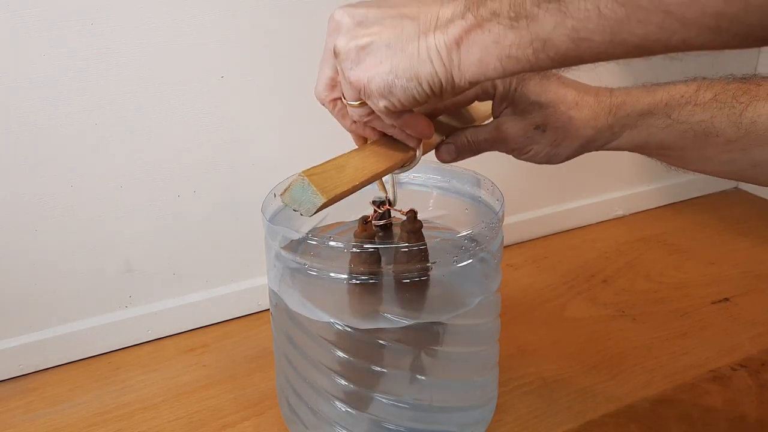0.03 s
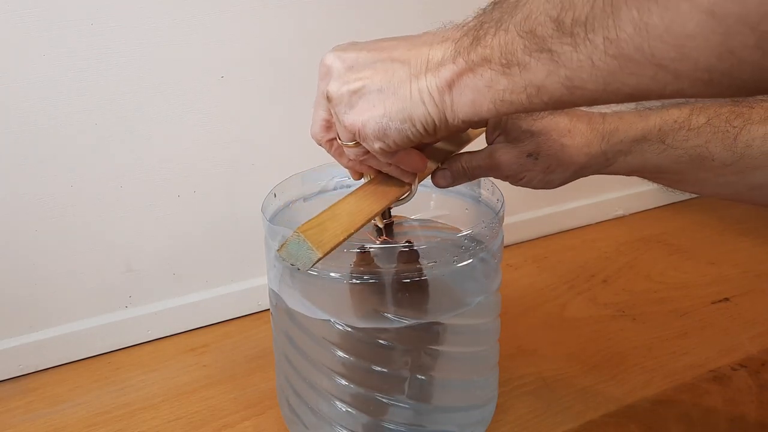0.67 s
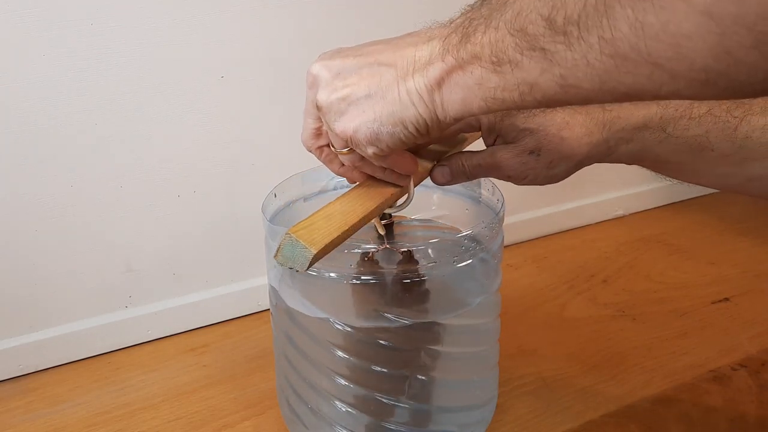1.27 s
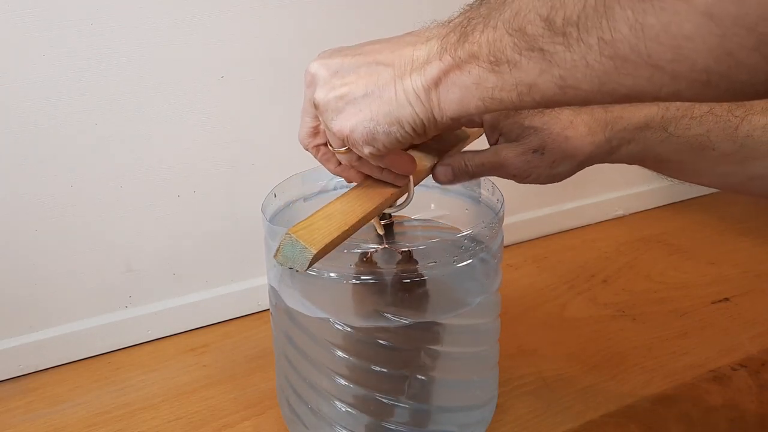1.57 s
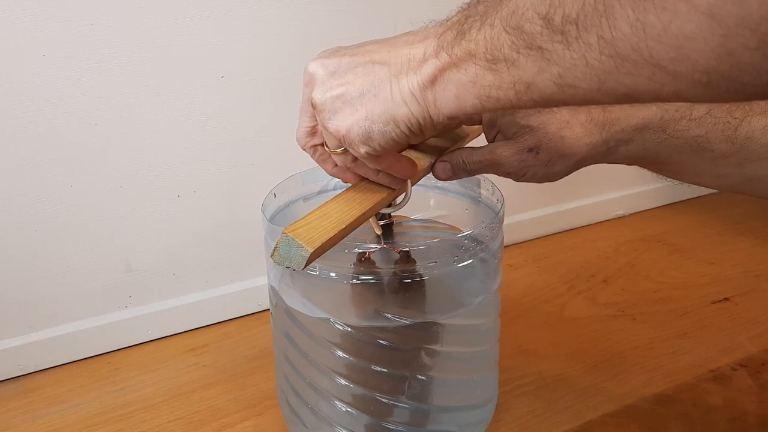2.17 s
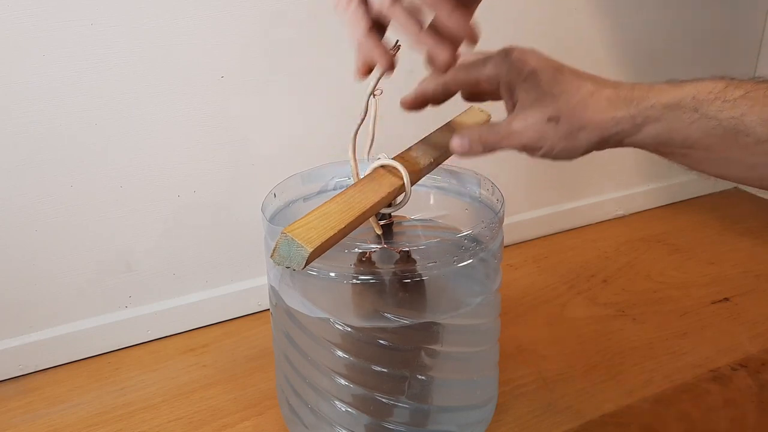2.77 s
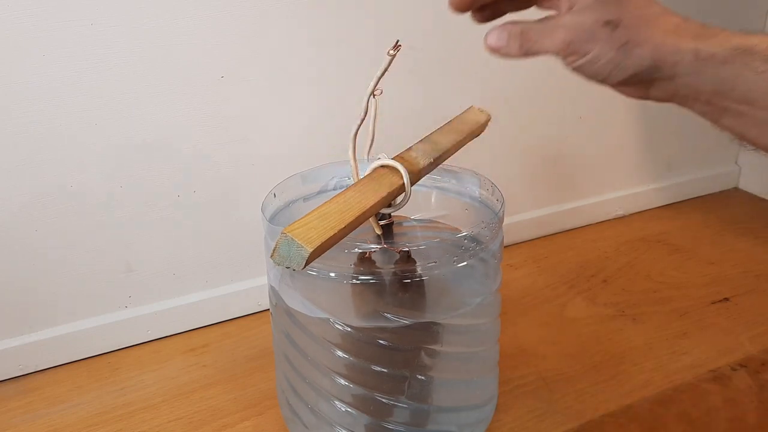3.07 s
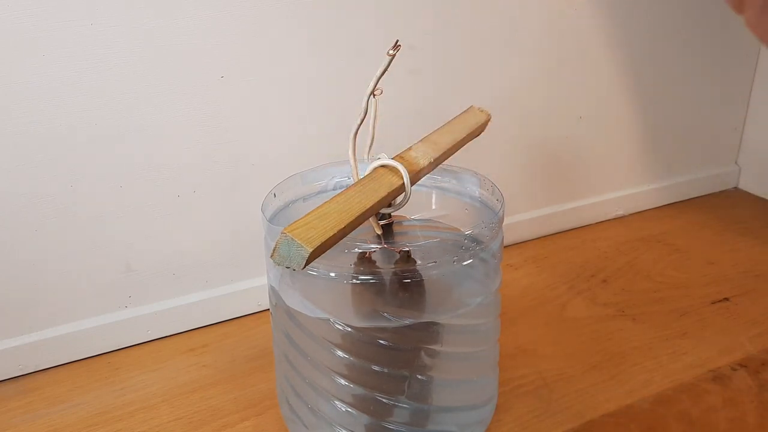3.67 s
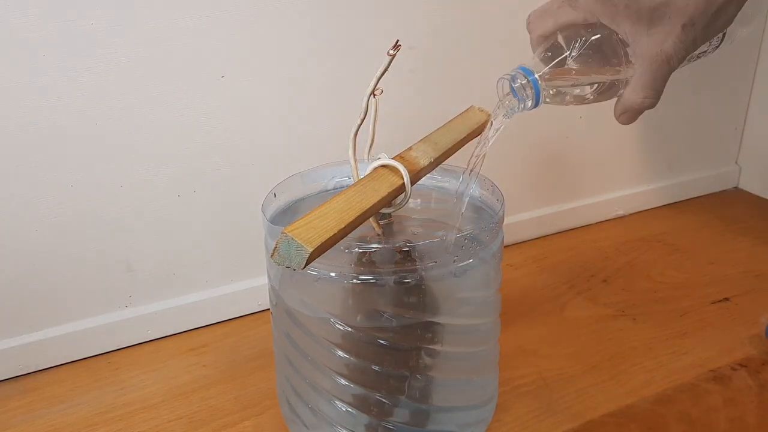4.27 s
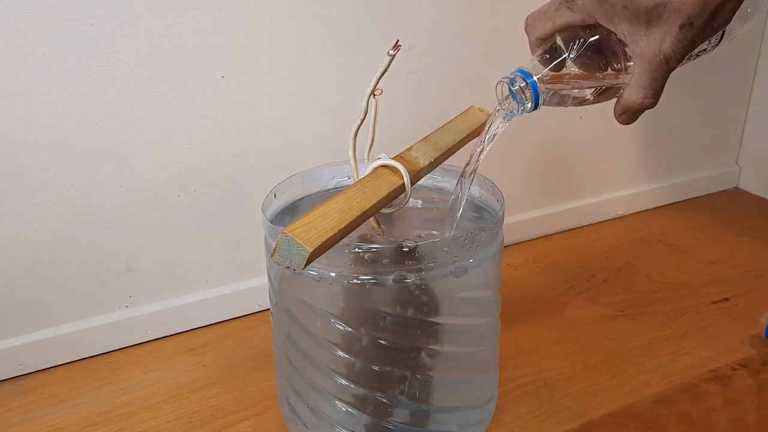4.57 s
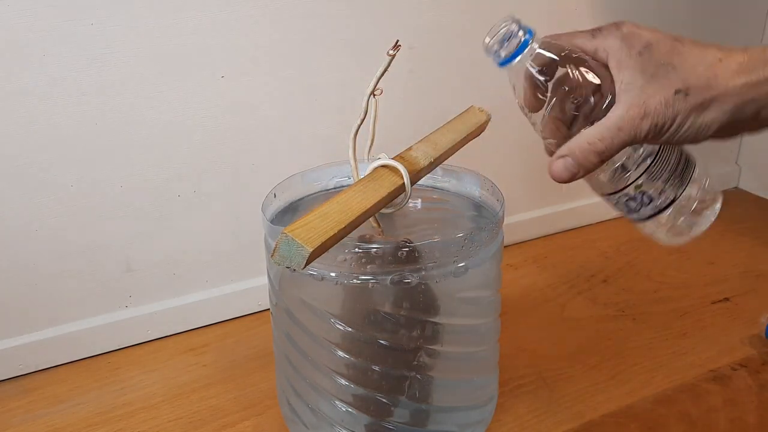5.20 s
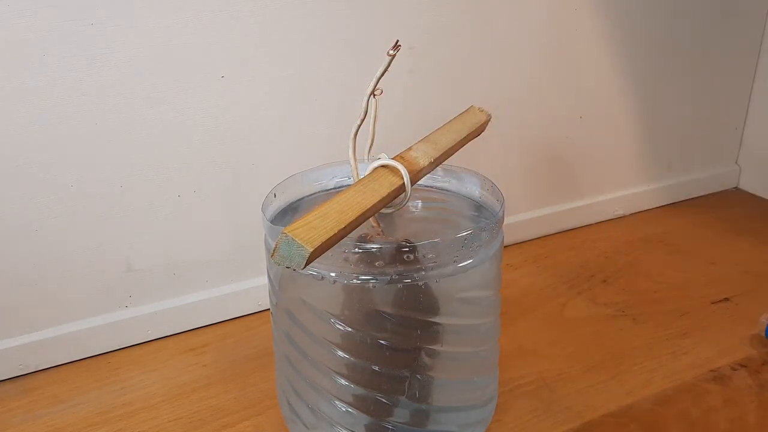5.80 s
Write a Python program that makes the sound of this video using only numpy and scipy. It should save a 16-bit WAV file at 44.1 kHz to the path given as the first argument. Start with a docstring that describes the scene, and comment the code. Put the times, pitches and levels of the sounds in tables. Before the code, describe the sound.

In a small room with a steady mains hum and faint hiss, wood knocks and rattles briefly on the rim of a filled plastic tub. Softer, dull bumps follow as the stick is adjusted. Only the background remains for a moment, dipping to silence and returning. Then water is poured thinly into the tub, plinking and fizzing, and finishes with a bright splash, a few light drips and a soft thud.

```python
"""Hollow knocks and a chatter: a wooden stick hung with metal weights is set down across a plastic tub
of water and nudged into place, ringing the tub's modes. The sound fades out and in; a thin stream from
a small bottle tops the tub up with ringing bubbles and fizz, ending in a splash and drips.
Mains hum and hiss fill the small room; a low rumble lasts until the fade."""
import sys
import numpy as np
from scipy import signal
from scipy.fft import rfft, irfft
from scipy.io import wavfile

SR = 44100
rng = np.random.default_rng(int(sys.argv[2]) if len(sys.argv) > 2 else 0)


def digitize_waveform(pressure):
    """Quantize a signal to 16-bit integers and store it at the path in sys.argv[1].

    Rows of a 2-D input are taken as channels; values are limited to [-1, 1].
    """
    field = np.atleast_2d(pressure).T
    bounded = np.clip(field, -1, 1)
    quanta = np.round(bounded * 32767).astype(np.int16)
    wavfile.write(sys.argv[1], SR, quanta)


N = 266364
TIME = np.arange(N) / SR
SILENT_S = 4.24  # between fade-out and fade-in
POUR_START_S, POUR_STOP_S = 4.48, 5.25  # steady stream
# heavy drops hitting the surface: t/s, slap level/dB, slap f/Hz, pock re slap/dB
HEAVY_DROPS = [(4.427, -52.5, 7400, -28), (4.544, -54.5, 6750, 9.5), (4.762, -63, 7240, -9),
               (4.875, -61, 5900, -17), (4.979, -54, 7100, 7), (5.015, -47, 7000, 15),
               (5.026, -44.5, 5400, -3), (5.05, -47.5, 5600, 16.5), (5.0729, -25, 7120, -6.5),
               (5.0763, -31.5, 6400, -24), (5.117, -46.5, 5600, 6), (5.189, -59.5, 6800, -20)]


def amp(db):
    """Decibels to gain."""
    return 10 ** (np.asarray(db) / 20)


def peaked(x):
    """Scale to peak 1."""
    return x / (abs(x).max() + 1e-30)


def lookup(points, hz):
    """Interpolate a table over log frequency."""
    f, value = np.transpose(points)
    return np.interp(np.log(hz + 1), np.log(f + 1), value)


def coloured(x, spectrum):
    """Filter by a spectrum table; rms 1."""
    gain = amp(lookup(spectrum, np.fft.rfftfreq(len(x), 1 / SR)))
    shaped = irfft(rfft(x) * gain, len(x))
    return shaped / np.sqrt(np.mean(shaped ** 2) + 1e-30)


def add(mix, s, sound):
    """Mix a sound in at time s."""
    part = mix[max(round(s * SR), 0):][:len(sound)]
    part += sound[:len(part)]


def noise_burst(t, spectrum, rise_s, t60_s):
    """Decaying coloured noise; rms 1."""
    noise = rng.standard_normal(len(t))
    return coloured(noise * amp(-60 * t / t60_s) * (1 - np.exp(-t / rise_s)), spectrum)


def ticks(swells, spectrum, per_s):
    """Dense tiny ticks; each swell gains 20 dB in its rise time and loses 20 dB in its fall time."""
    impulses = rng.standard_normal(N) * (rng.random(N) < per_s / SR)
    envelope = sum(amp(db - 20 * np.maximum((s - TIME) / rise_s, (TIME - s) / fall_s))
                   for s, db, rise_s, fall_s in swells)
    return envelope * coloured(impulses, spectrum)


def room(x, first_s, wet_db=-6):
    """Direct sound plus sparse reflections, each band dying at its own rate."""
    # room decay: f/Hz, t60/s
    decay = [(150, 0.45), (400, 0.22), (1000, 0.27), (2800, 0.17), (7000, 0.13), (14000, 0.18)]
    taps = rng.standard_normal(SR // 2) * (rng.random(SR // 2) < 1 / 8)
    hz, t, bands = signal.stft(taps, SR, nperseg=256)
    tail = signal.istft(bands * amp(-60 * t / lookup(decay, hz)[:, None]), SR, nperseg=256)[1]
    tail *= np.arange(len(tail)) > first_s * SR
    return x + amp(wet_db) * signal.fftconvolve(x, tail / np.linalg.norm(tail))[:N]


def background():
    """Steady air and hiss; a low rumble that ends with the fade-out."""
    # noise spectra: f/Hz, density/dB
    air_spectrum = [(12, -35.5), (30, -15.5), (65, -3.5), (100, 0), (135, -5), (200, -12), (250, -16),
                    (400, -21.5), (700, -34.5), (1500, -62.5)]
    hiss_spectrum = [(100, 5), (700, 5), (1200, 2.5), (2500, -1.5), (5000, -2.5), (7500, -1), (10000, -2.5),
                     (15500, -2.5)]
    rumble_spectrum = [(30, -24), (65, -6), (110, 0.5), (140, -5), (175, -9), (205, -5), (240, -4),
                       (280, -23.5), (370, -16), (430, -29.5), (650, -39.5), (1200, -73.5)]
    air, hiss, rumble = rng.standard_normal((3, N))
    steady = amp(-68) * coloured(air, air_spectrum) + amp(-86.5) * coloured(hiss, hiss_spectrum)
    return steady + amp(-62.5) * coloured(rumble, rumble_spectrum) * (TIME < SILENT_S)


def hum(mains_hz=50, smear_rad=0.67):
    """Odd mains harmonics, nearly in phase: a faint buzz twice a cycle."""
    # hum partials: harmonic number, rms level/dB
    harmonics = [(1, -51), (3, -62.5), (5, -72), (7, -79), (9, -90), (11, -87.5), (13, -97.5), (15, -104),
                 (17, -103), (19, -102), (21, -105), (25, -110)]
    phase = 2 * np.pi * (mains_hz * TIME + rng.random())
    return sum(np.sqrt(2) * amp(db) * np.cos(k * phase + smear_rad * rng.standard_normal())
               for k, db in harmonics)


def bottle_rustle():
    """The emptied bottle's thin plastic crumples in the hand."""
    # rustle: peak t/s, level/dB, rise/s, fall/s
    swells = [(5.89, -72.5, 0.064, 0.088)]
    # thin plastic: f/Hz, density/dB
    spectrum = [(500, -7), (1500, -4), (2800, 2.5), (4000, -1), (7000, 5.5), (11000, -18)]
    return ticks(swells, spectrum, per_s=2000)


def string_rub():
    """The string rubs on the stick in tiny slips."""
    # rubs: peak t/s, level/dB, rise/s, fall/s
    strokes = [(0.03, -84, 0.11, 0.044), (1.02, -78, 0.14, 0.1), (1.45, -92, 0.09, 0.15),
               (1.62, -91, 0.077, 0.085), (2.1, -97, 0.1, 0.073)]
    # narrow resonances: f/Hz, density/dB
    spectrum = [(500, 6), (900, 4), (1400, -3.5), (1800, -15.5), (2250, 6.5), (2800, -17), (3400, -15.5),
                (3750, 1.5), (4400, -21.5), (5500, -5), (6300, -21), (7300, -8.5), (11000, -21.5)]
    return ticks(strokes, spectrum, per_s=4000)


def stick_slide():
    """The stick slides on the rim in tiny slips."""
    # slide: peak t/s, level/dB, rise/s, fall/s
    strokes = [(1.805, -67.5, 0.046, 0.043)]
    # wood scraping plastic: f/Hz, density/dB
    spectrum = [(300, -11), (650, 0.5), (950, -9), (1380, 0.5), (1750, -25), (2500, -19), (3300, -17),
                (4600, -31), (9000, -38)]
    return ticks(strokes, spectrum, per_s=3000)


def knocks(spread_oct=0.44, rise_s=0.0013):
    """Each blow rings the tub's modes near its centre frequency, with a dry crack of wood on plastic."""
    # blows on tub and table (stick lands, is nudged; last, bottle is handled, set down):
    # t/s, ring level/dB, centre f/Hz, crack re ring/dB
    blows = [(0.566, -68, 506, 3), (0.6252, -43, 610, -1.5), (0.6304, -31.5, 423, -15.5),
             (0.71, -51.5, 270, -12), (0.839, -43.5, 393, -30), (1.231, -52, 436, -22.5),
             (1.508, -53, 365, -41), (1.707, -49, 348, -37), (1.876, -53, 388, -31),
             (1.961, -48.5, 362, -37), (2.155, -49.5, 356, -44), (5.313, -57.5, 279, 1),
             (6.020, -45, 221, -16)]
    # modes of the filled tub: f/Hz, level/dB, t60/s
    modes = [(167, -7.5, 0.32), (206.3, 0, 0.2), (269, -4, 0.13), (307.5, -1.5, 0.085), (345, -8, 0.076),
             (385, -9.5, 0.09), (463.6, -9.5, 0.079), (523, -6.5, 0.078), (598, -6.5, 0.079),
             (670, -4.5, 0.12), (880, -1.5, .1), (950, -11.5, 0.25), (1468, -30, .12), (1750, -17, .12),
             (2315, -10, 0.13)]
    # wood on thin plastic: f/Hz, density/dB
    crack_spectrum = [(150, 8), (400, -3), (800, -4), (1200, 0), (2300, -6), (3000, -12.5), (5000, -19),
                      (8500, -32.5), (11000, -50)]
    # the landed stick chatters on the rim: evenly spaced, weakening rebounds
    rebounds = [(0.639 + k * 0.0168, -35 - k * 2.5, 190, -21) for k in range(5)]
    t, out = np.arange(SR // 2) / SR, np.zeros(N)
    hz, db, t60_s = np.transpose(modes)[:, :, None]
    for s, ring_db, centre_hz, crack_db in blows + rebounds:
        weight = 1 / (1 + (np.log2(hz / centre_hz) / spread_oct) ** 2)
        ring = (weight * amp(db - 60 * t / t60_s) * np.sin(2 * np.pi * hz * t)).sum(0)
        ring *= 1 - np.exp(-t / rise_s)
        # a soft nudge cannot reach the high modes
        ring = signal.sosfilt(signal.butter(4, 1.36 * centre_hz, fs=SR, output="sos"), ring)
        crack = noise_burst(t, crack_spectrum, rise_s=0.0012, t60_s=0.046)
        add(out, s, amp(ring_db) * (peaked(ring) + amp(crack_db) * peaked(crack)))
    return out


def flow_db(s, rise_s=0.2, calm_db_per_s=14):
    """Water activity: builds, holds while the stream runs, calms."""
    early_s, late_s = np.maximum(POUR_START_S - s, 0), np.maximum(s - POUR_STOP_S, 0)
    return -20 * early_s / rise_s - calm_db_per_s * late_s


def scattered(per_s, end_s, level_db, spread_db, centre_hz, spread_oct):
    """Loosely spaced events whose level follows the flow: t/s, level/dB, f/Hz."""
    jitter, size, pitch = rng.uniform(-1.2, 1, size=(200, 3)).T
    s = POUR_START_S + (np.arange(len(jitter)) + 1 + jitter) / per_s
    db = level_db + flow_db(s) + spread_db * size
    hz = centre_hz * 2 ** (spread_oct * pitch)
    return np.transpose([s, db, hz])[s < end_s]


def bubble(hz, t60_s, rise_cycles, climb=0.15):
    """A ringing air pocket; its pitch climbs by a fraction as it nears the surface."""
    t = np.arange(SR // 10) / SR
    cycles = np.cumsum(hz * (1 + climb * np.minimum(t / t60_s, 1))) / SR
    onset = 1 - np.exp(-(cycles / rise_cycles) ** 2)
    return np.sin(2 * np.pi * cycles) * amp(-60 * t / t60_s) * onset


def fizz(per_s=800, centre_hz=6310, spread_oct=0.22, sink_oct_per_s=0.55, stir_t60_s=0.34):
    """Pinhead bubbles follow the flow, flare after heavy drops and sink in pitch as the water calms."""
    span_s, crowd = N / SR - SILENT_S, np.zeros(N)
    for when, size, radius, angle in rng.random((int(per_s * span_s), 4)):
        s = SILENT_S + when * span_s
        gaussian = np.sqrt(-2 * np.log(1 - radius)) * np.cos(2 * np.pi * angle)
        sink_oct = sink_oct_per_s * max(s - POUR_STOP_S, 0)
        hz = min(centre_hz * 2 ** (spread_oct * gaussian - sink_oct), SR / 3)
        size_db = 2 * min(-np.log(1 - size), 4)
        add(crowd, s, amp(size_db) * bubble(hz, t60_s=45 / hz, rise_cycles=5.4, climb=0.015))
    level_db = -84 + flow_db(TIME)
    for s, slap_db, *_ in HEAVY_DROPS:
        stirred_db = min(slap_db - 17, -71) - 60 * (TIME - s) / stir_t60_s
        level_db = np.where(TIME > s, np.maximum(level_db, stirred_db), level_db)
    return amp(level_db) * crowd / crowd[int(SILENT_S * SR):].std()


def spray():
    """The last gulp throws up a fine spray."""
    # spray: peak t/s, level/dB, rise/s, fall/s
    swells = [(5.115, -65.5, 0.14, 0.074)]
    # fine droplets: f/Hz, density/dB
    spectrum = [(400, -11), (1000, -1), (2500, -7), (4200, -4), (7000, -5), (9500, 0), (11000, -5),
                (14000, -20)]
    return ticks(swells, spectrum, per_s=1600)


def plinks(ring_cycles=61.6, shed_s=0.03, shed_oct=0.3):
    """Large bubbles, each shedding short-lived ones; a trickle of small ones; pocks of heavy drops."""
    # air trapped by the falling water: t/s, f/Hz, level/dB
    large_bubbles = [(4.276, 2930, -61.5), (4.359, 4920, -57.5), (4.372, 1880, -69), (4.522, 2720, -52),
                     (4.536, 2210, -62), (4.561, 2980, -53.5), (4.821, 2680, -51), (4.841, 2100, -57.5),
                     (4.885, 2190, -57), (4.942, 2230, -60), (4.957, 1790, -54.5), (4.976, 2580, -55),
                     (5.025, 2380, -39.5), (5.051, 1126, -49), (5.091, 926, -41.5), (5.108, 1577, -51.5),
                     (5.117, 2900, -44), (5.182, 3070, -47), (5.314, 1960, -53), (5.723, 4280, -64.5),
                     (5.979, 5400, -58)]
    out = np.zeros(N)
    for s, hz, db in large_bubbles:
        add(out, s, amp(db) * bubble(hz, ring_cycles / hz, rise_cycles=0.98))
        for delay, pitch in zip(rng.random(7), rng.standard_normal(7)):
            shed = bubble(hz * 2 ** (shed_oct * pitch), t60_s=0.021, rise_cycles=0.89)
            add(out, s + shed_s * delay, amp(db - 13) * (1 - delay / 2) * shed)
    trickle = scattered(per_s=45, end_s=POUR_STOP_S, level_db=-71.5, spread_db=2,
                        centre_hz=2194, spread_oct=0.46)
    for s, db, hz in trickle:
        add(out, s, amp(db) * bubble(hz, ring_cycles / hz, rise_cycles=3.1))
    for s, slap_db, _, pock_db in HEAVY_DROPS:
        add(out, s, amp(slap_db + pock_db) * bubble(hz=2250, t60_s=0.0056, rise_cycles=1))
    return out


def slaps(burst_s=0.0011, rattle_db=-9):
    """Drop impacts: a few bright cycles, then a rattle of echoes in the tub's neck."""
    # rattle spectrum: f/centre f, density/dB
    rattle_shape = [(.08, -13.5), (.3, -10), (.62, -10), (.85, -3), (1.14, -3.5), (1.34, -6), (1.5, -43),
                    (2.1, -43)]
    t, out = np.arange(SR // 10) / SR, np.zeros(N)
    burst = np.tanh(2 * np.sin(np.pi * np.minimum(t / burst_s, 1)))
    droplets = scattered(per_s=28, end_s=N / SR, level_db=-67.5, spread_db=7.5,
                         centre_hz=6160, spread_oct=0.16)
    for s, slap_db, hz, *_ in [*HEAVY_DROPS, *droplets]:
        spectrum = [(hz * ratio, db) for ratio, db in rattle_shape]
        rattle = noise_burst(t, spectrum, rise_s=0.00022, t60_s=0.054) * (1 - t / t[-1])
        impact = burst * np.sin(2 * np.pi * hz * t)
        add(out, s, amp(slap_db) * (impact + amp(rattle_db) * peaked(rattle)))
    return out


def scene():
    """Stick, water and bottle in the room, over hum and background noise."""
    stick = knocks() + stick_slide() + string_rub()
    bottle_and_spray = bottle_rustle() + spray()
    pour = room(plinks(), first_s=0.0016) + room(slaps() + fizz() + bottle_and_spray, first_s=0.002)
    return (room(stick, first_s=0.0042) + pour + hum() + background())[None]


def record(dry, fade_s=0.36, cutoff_hz=15750):
    """Fade to silence and straight back in, then low-pass."""
    fade_out = np.clip((SILENT_S - TIME) / fade_s, 0, 1) ** 1.19
    fade_in = np.clip((TIME - SILENT_S) / fade_s, 0, 1)
    lowpass = signal.firwin(511, cutoff_hz, window=("kaiser", 9), fs=SR)
    return signal.oaconvolve(dry * (fade_out + fade_in), lowpass[None], "same")


dry = scene()
out = record(dry)
digitize_waveform(out)
```